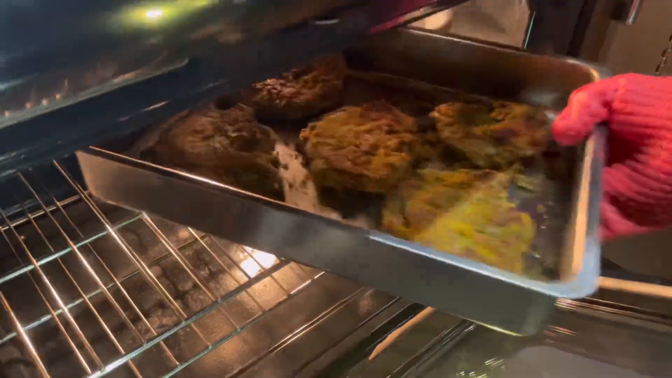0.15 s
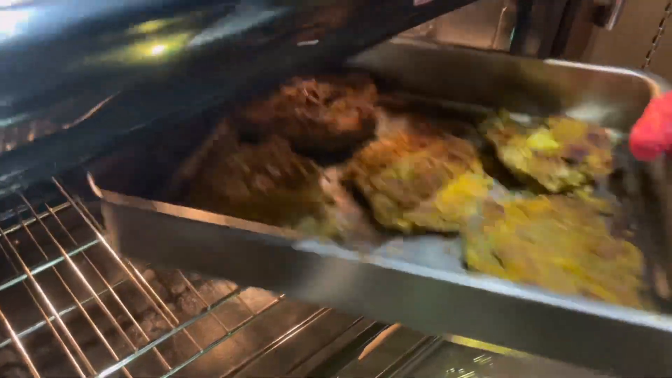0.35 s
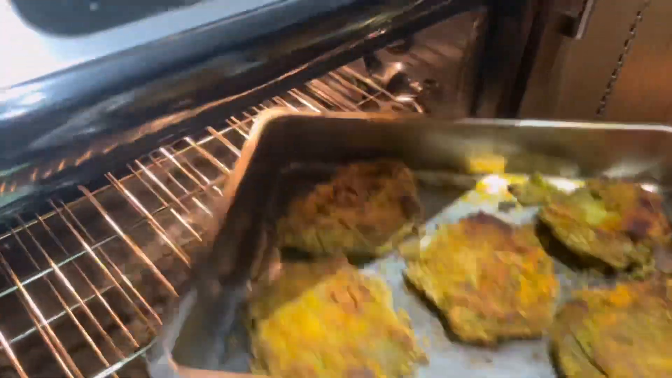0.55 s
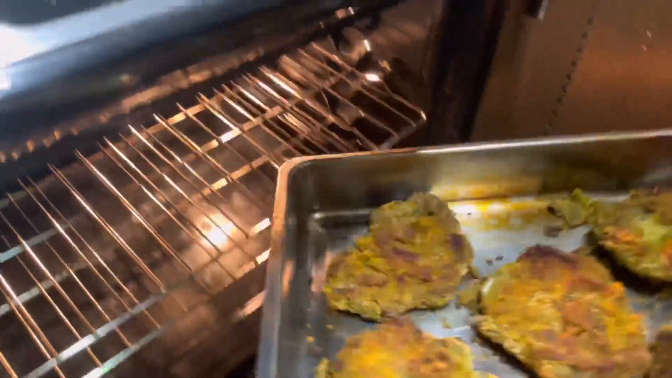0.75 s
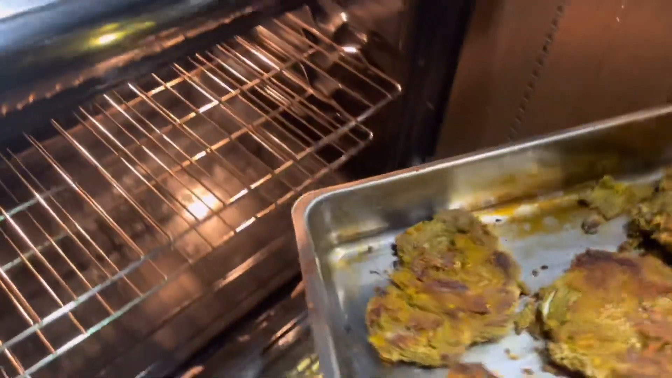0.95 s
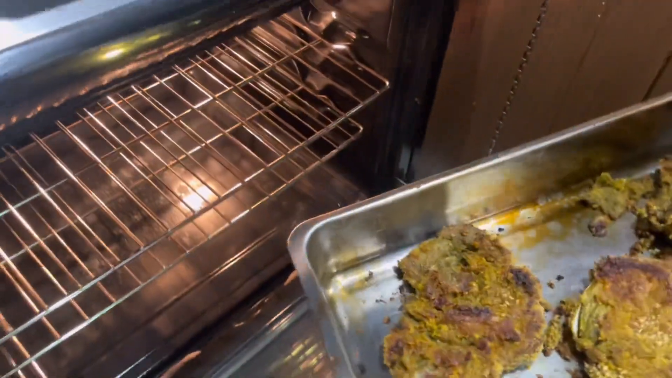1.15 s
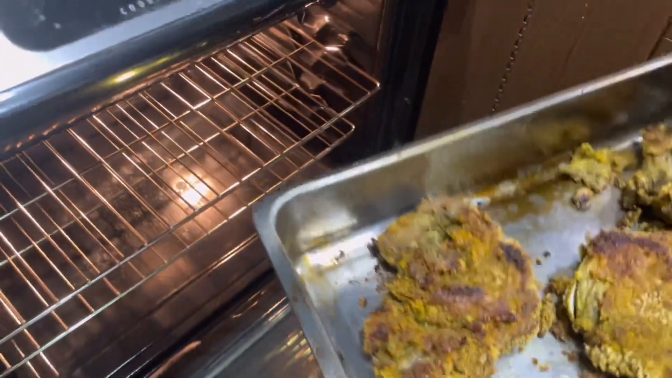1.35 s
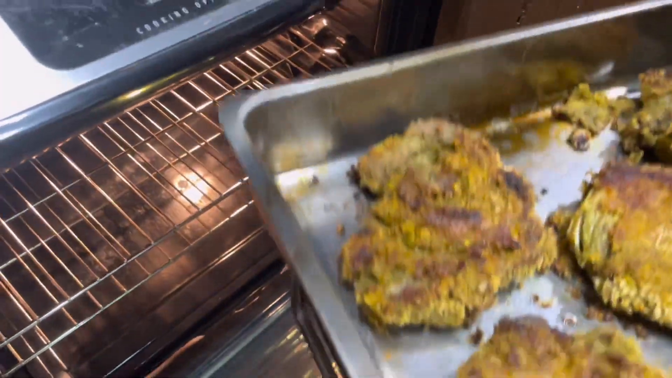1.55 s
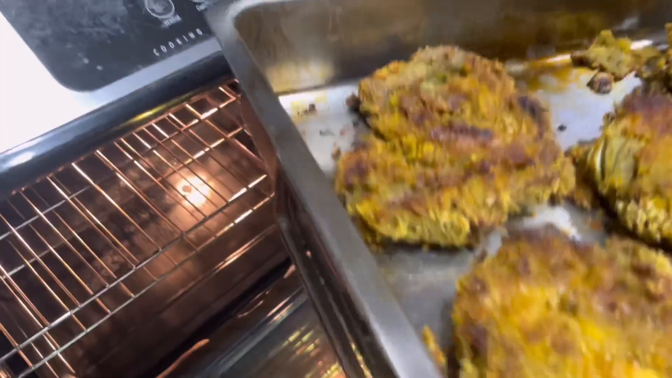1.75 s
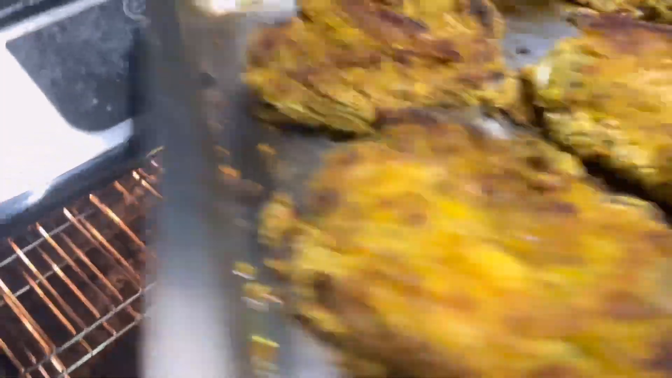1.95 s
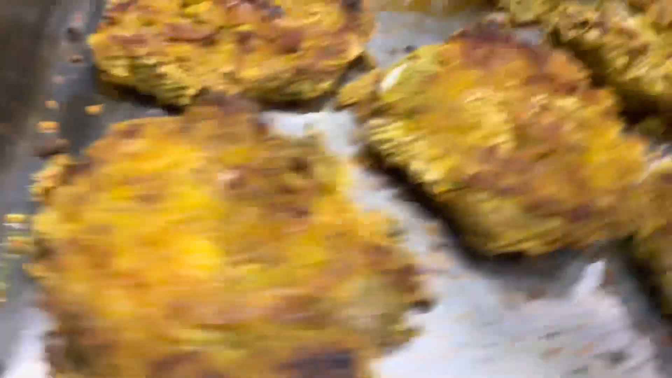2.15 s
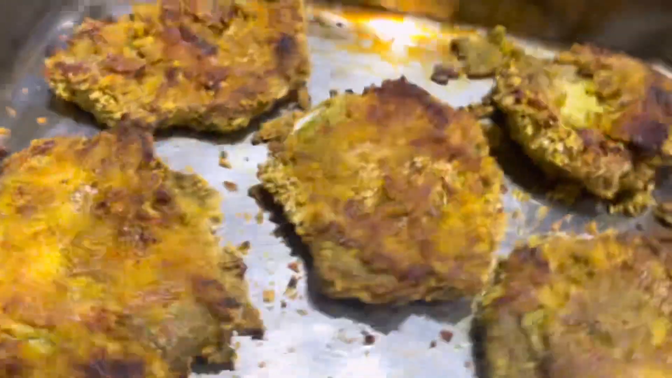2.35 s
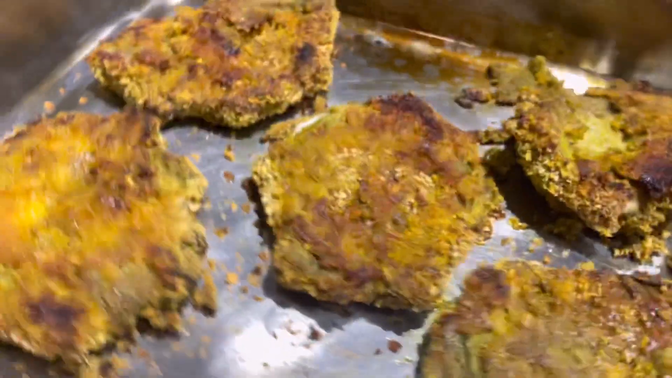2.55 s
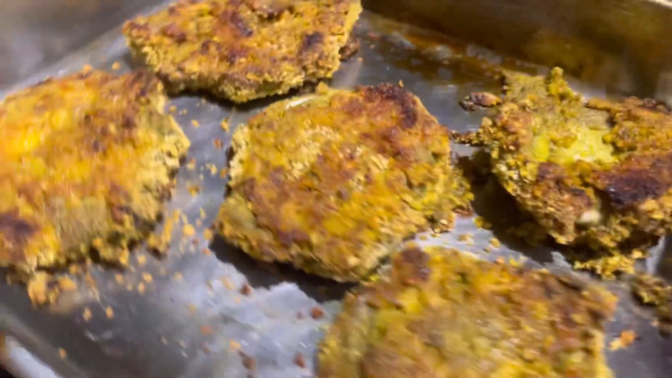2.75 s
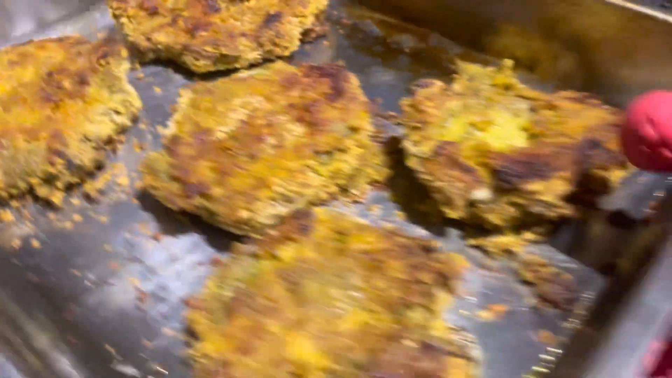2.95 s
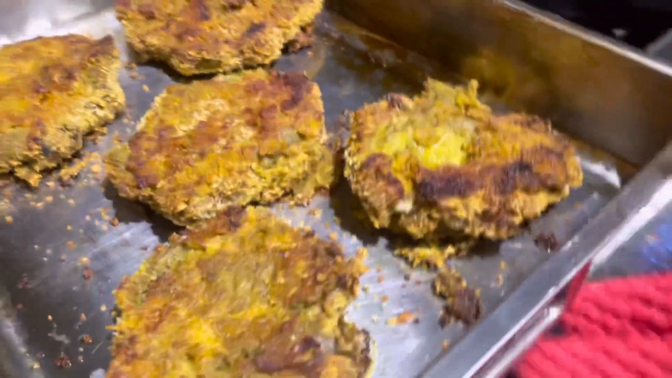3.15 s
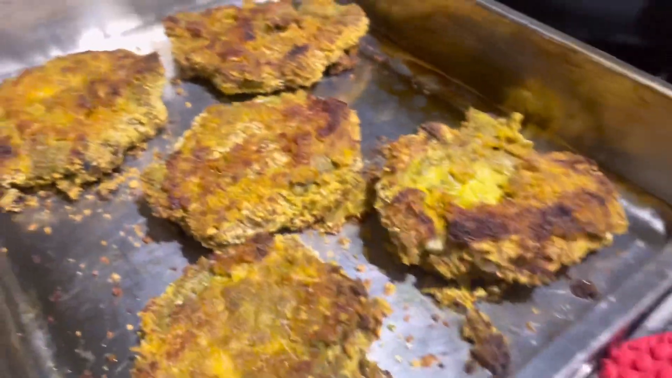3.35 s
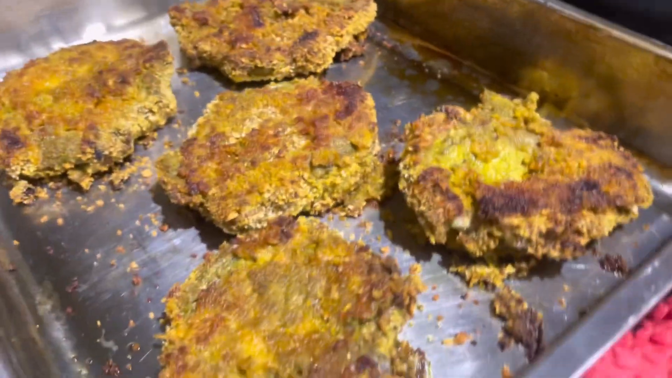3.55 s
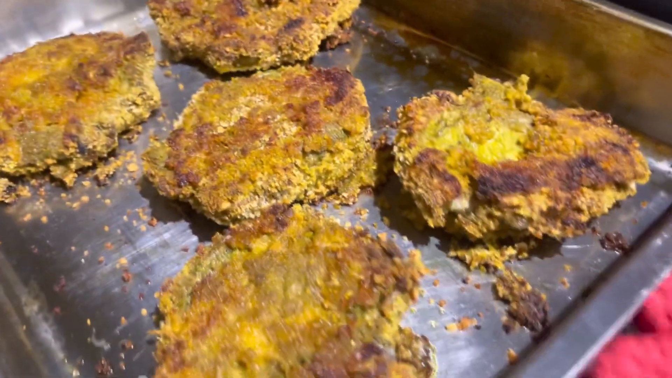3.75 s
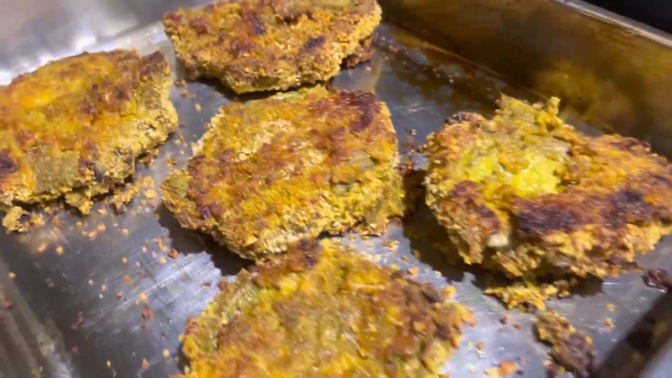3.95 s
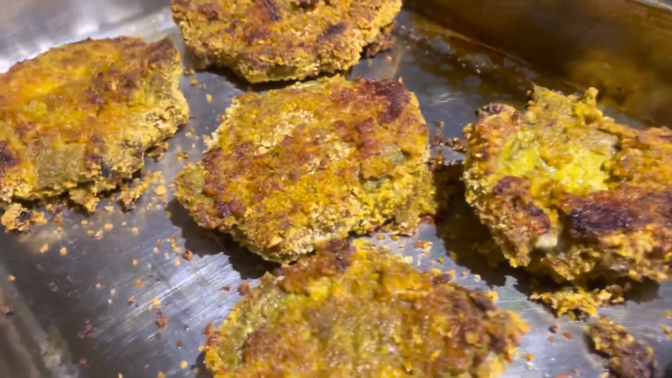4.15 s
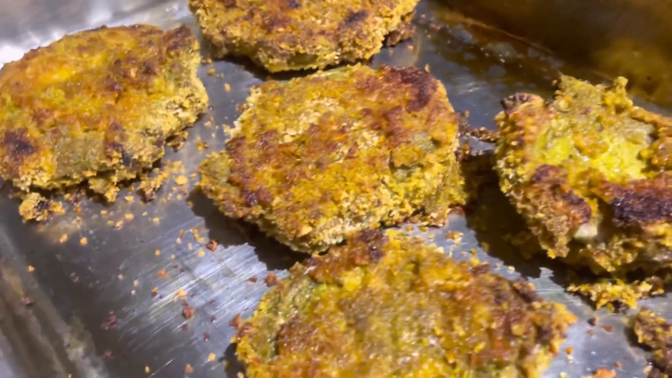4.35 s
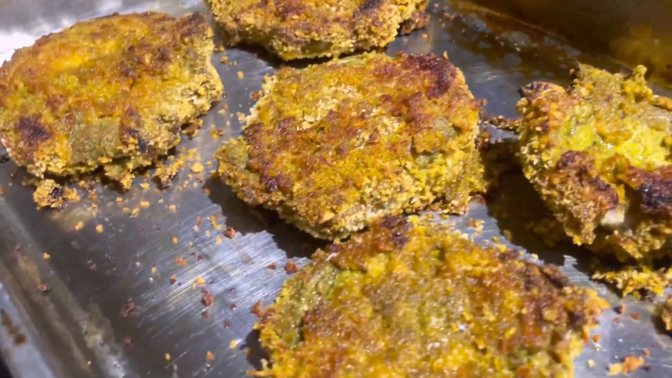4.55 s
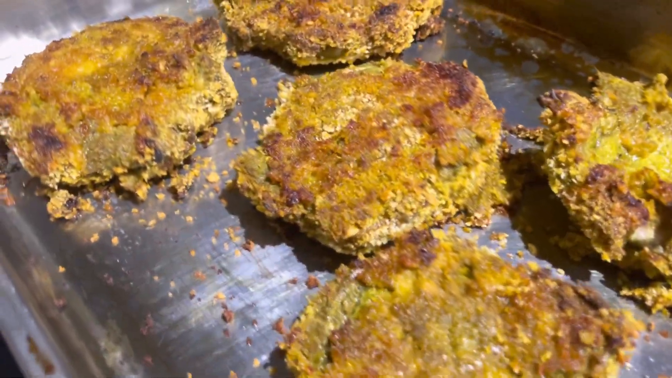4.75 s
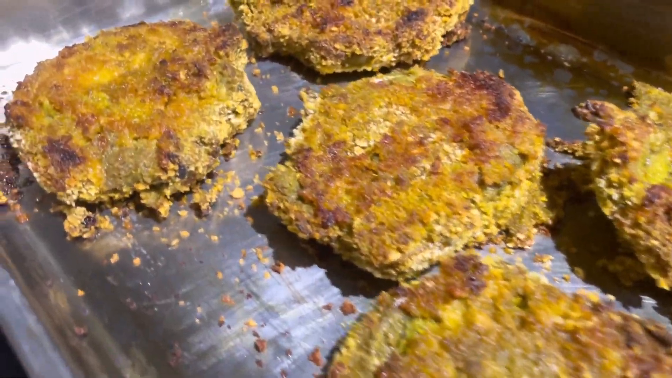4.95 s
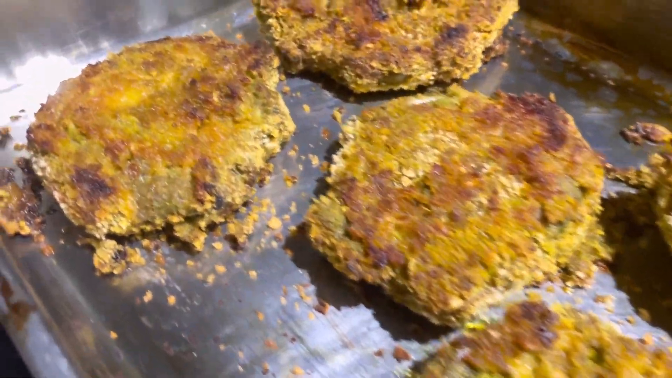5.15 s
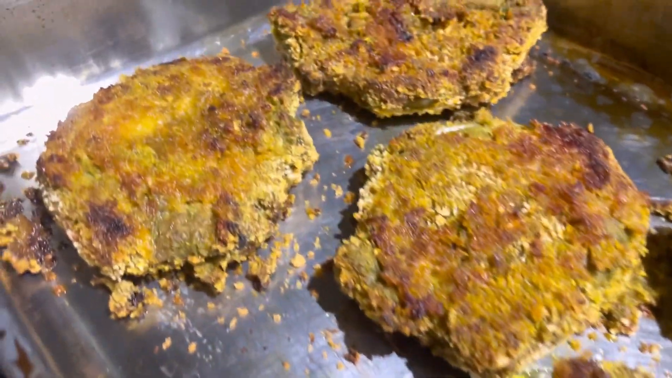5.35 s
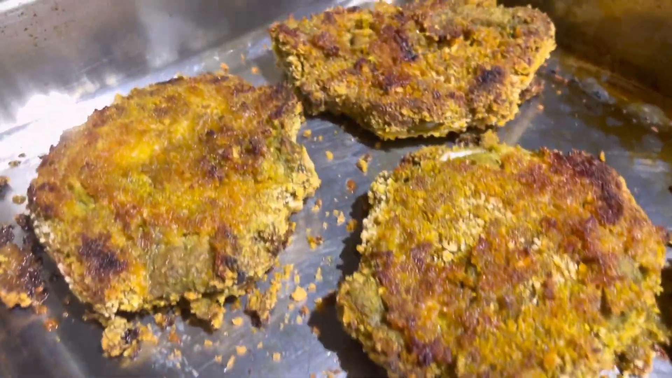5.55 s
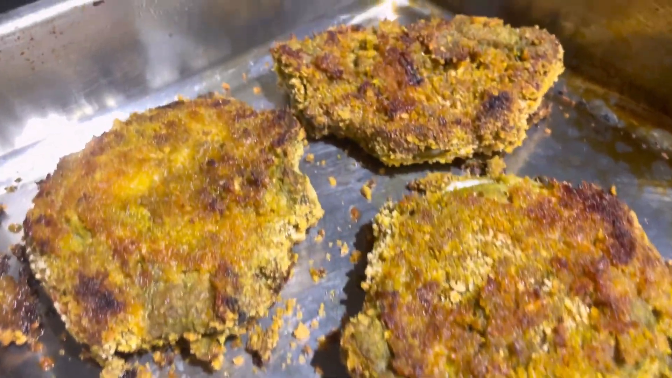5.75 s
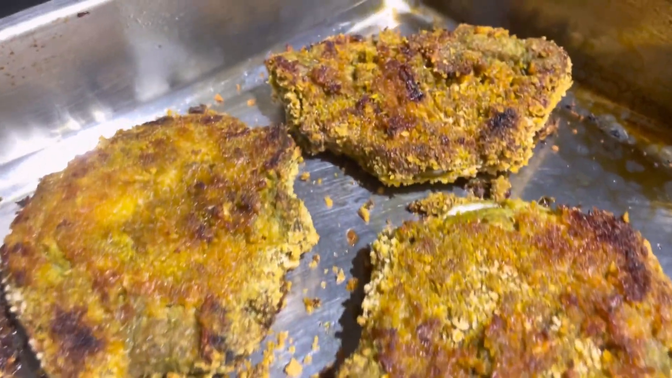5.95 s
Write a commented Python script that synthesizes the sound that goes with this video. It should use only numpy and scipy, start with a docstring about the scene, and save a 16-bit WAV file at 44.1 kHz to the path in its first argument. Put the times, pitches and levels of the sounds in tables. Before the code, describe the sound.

A low, breathy oven fan hums throughout a small hard-walled kitchen. At the start a metal baking tray ticks and clanks ringingly against the oven's steel. After a pause it is set down in three quick hollow clacks, then slides with a short rattling scrape. A faint rub follows. Near the end the tray is nudged with dull thuds, tinny knocks and tiny high squeaks. Close handheld stereo microphone, moving from oven to tray.

```python
"""Baking tray out of the oven

A metal tray is lifted off an oven rack, clanks on the oven, is set down in three clacks and slid a little;
later it is nudged and squeaks. Struck and rubbed metal is noise contacts exciting decaying modes.
A fan hums throughout as shaped noise, boomier as the listening point moves from oven to tray.
The small kitchen adds reverberation, and two closely spaced microphone ports hear it all."""
import sys
import numpy as np
from scipy import signal
from scipy.fft import rfft, irfft, next_fast_len
from scipy.io import wavfile
from scipy.ndimage import uniform_filter1d, map_coordinates

SR = 44100
rng = np.random.default_rng(int(sys.argv[2]) if len(sys.argv) > 2 else 0)


def pcm_store(signal):
    """Save signal as 16-bit PCM."""
    levels = np.round(np.clip(np.atleast_2d(signal), -1, 1) * 32767)
    wavfile.write(sys.argv[1], SR, levels.astype(np.int16).T)


N = 264644
TIME = np.arange(N) / SR
# padded transform length and its frequencies in Hz
SIZE = next_fast_len(N + SR, True) // 2 * 2
FREQS = np.arange(SIZE // 2 + 1) * SR / SIZE

# Fan noise in front of the oven. Each row: frequency in Hz, relative level in dB.
FAN_AT_OVEN = [(28, -94), (50, -11.5), (90, -23.5), (130, -8), (160, -17.5), (192, -6), (245, -25),
               (305, -13.5), (400, -26.5), (480, -23), (700, -28.5), (1000, -28), (1400, -30), (3000, -37),
               (3700, -37.5), (4900, -37), (5700, -47.5), (6800, -44.5), (8000, -50.5), (15000, -59.5)]
# Fan noise by the tray. Each row: frequency in Hz, relative level in dB.
FAN_BY_TRAY = [(28, -31), (50, -11.5), (130, -5), (240, -10.5), (310, -6), (400, -22), (520, -16.5),
               (650, -32), (880, -28.5), (1100, -24), (1400, -25.5), (2700, -36.5), (4900, -40.5),
               (5700, -47.5), (6700, -42.5), (8000, -45), (15000, -57)]
# Fan along the way. Each row: time in seconds, gain of the oven noise in dB, gain of the tray-side air in dB.
FAN_WAY = [(0, 2, -43), (.8, 0.3, -18), (1.5, -.5, -15), (2.3, -0.5, -7.5), (3.3, -2.5, -2.5),
           (4.2, -6.5, 0), (4.9, -2, 0.5), (5.4, -5.5, 0.5), (6, -0.5, 1.5)]
# Nearest reflection. Each row: time in seconds, delay in ms.
REFLECTION = [(0, 1.2), (.9, 1.19), (1.5, 2.15), (2.3, 2.3), (3.3, 1.3), (4.2, 2.4), (6, 2.1)]
# Drifting hollow band in the air noise. Each row: time in seconds, centre in Hz, level in dB.
HOLLOW = [(.5, 1393, -48.5), (.9, 1384, -48), (1.25, 1304, -45), (1.5, 1276, -53), (1.72, 1200, -42.5),
          (2.05, 1356, -55), (2.3, 1349, -41), (3.2, 1330, -53), (3.65, 1402, -51), (4.1, 1387, -45),
          (4.8, 1373, -48.5), (5.35, 1365, -40), (6, 1377, -38)]
# Second hollow band, mostly above it. Each row: time in seconds, centre in Hz, level in dB.
UPPER_HOLLOW = [(.6, 1800, -56), (1.15, 1884, -46.5), (1.35, 1650, -56), (1.5, 1644, -43),
                (1.72, 1748, -49), (1.95, 1583, -43), (2.3, 1700, -51), (3.25, 1620, -45),
                (3.65, 2100, -47), (3.95, 1750, -55), (4.95, 1691, -48), (5.4, 2098, -51), (6, 2150, -44)]
# Share of the sound that differs between the ports. Each row: frequency in Hz, relative level in dB.
DIFFUSE = [(50, -18), (130, -15.5), (250, -14), (500, -10), (1000, -8), (2500, -7), (5000, -7.5),
           (8000, -14), (12000, -17)]
# Lead of the left port. Each row: frequency in Hz, phase in radians.
PORT_PHASE = [(100, 0), (430, .1), (750, .8), (1300, .25), (2500, 1.3), (3600, .35), (4500, 1),
              (5900, -1.1), (6700, -.6), (7700, -2.7), (9500, -3.5), (10600, -4.5), (12500, -6.2)]
# Balance before each source's shadow strength. Each row: frequency in Hz, left minus right in dB.
PORT_BALANCE = [(60, 1.5), (450, 1), (900, 5.5), (1700, 1), (3800, 3), (6500, 2.5), (10000, -1.5)]
# Dull thuds on the counter. Each row: start in seconds, length in seconds, centre in Hz, level in dB.
THUMPS = [(5.531, 0.024, 111.3, -20), (5.584, 0.058, 67.7, -21.5), (5.741, 0.021, 82, -32),
          (5.959, 0.011, 108.8, -29)]
# Mitt on the rim. Each row: start in seconds, length in seconds, relative level in dB.
BRUSHES = [(3.505, 0.018, -43), (3.619, 0.051, -42.5)]
# Stick-slip squeaks. Each row: start in seconds, length in seconds, starting pitch in Hz, level in dB,
# waver as a share of the pitch.
SQUEAKS = [(5.577, 0.015, 5780, -32.5, 0.0015), (5.642, 0.049, 5715, -56, 0.0017),
           (5.714, .018, 5880, -46, 0.0042), (5.742, 0.016, 6060, -37, 0.0089),
           (5.76, 0.033, 5920, -45, 0.00405), (5.873, 0.02, 6020, -47, 0.0058)]
# Modes of the oven's steel. Each row: frequency in Hz, relative level in dB, t60 in seconds.
OVEN_STEEL = [(451, -8, .28), (714.4, 1.5, 0.14), (829, -11, 0.6), (1045, -19, 0.44), (1653, -18.5, .3),
              (1800, -12, .09), (2285, -7, .08), (2570, -17, .09), (2870, -20, 0.096), (3620, -10, 0.046),
              (4800, -12, .05), (4900, -26, 0.43), (5460, -20, 0.064)]
# Nominal modes of the tray. Each row: frequency in Hz, relative level in dB, t60 in seconds.
TRAY = [(174, -6, 0.061), (197.5, 5, 0.081), (239.5, -1, 0.14), (278, -15, 0.091), (377.4, -2, 0.16),
        (452.5, -4.5, 0.33), (548, 0.5, 0.092), (699, -9.5, 0.25), (718, -4, 0.15), (780, 2.5, 0.13),
        (835, -14, 0.079), (969, -5, 0.2), (1036, -9, .25), (1170, -5, 0.059), (1280, -4.5, 0.16),
        (1645, -17, 0.062), (1920, -2, 0.079), (2084, 6, 0.068), (2660, 3.5, 0.091), (2864, -6, 0.14),
        (3340, -10, 0.1), (3500, -16, 0.15), (4020, -6, 0.14), (4790, -15, 0.3)]
# Pushes on the tray. Each row: start in seconds, length in seconds, friction in dB, release in dB per second.
PUSHES = [(0.004, 0.016, -5.5, 142), (2.759, 0.16, 5, 110), (2.975, 0.044, 0.5, 92),
          (3.058, .015, -16, 124), (3.604, 0.15, -5.5, 120), (5.524, 0.051, 0.5, 120)]
# Colour of the scrape. Each row: frequency in Hz, relative level in dB.
SCRAPE = [(100, -16), (300, -27.5), (450, -11), (560, -12.5), (720, -22), (1050, -21), (1500, -26),
          (2500, -30.5), (4500, -35.5), (6000, -40.5), (9000, -38), (15000, -43.5)]
# Blows on the tray; how it is held and supported shifts and damps its modes. Each row: start in seconds,
# thud in dB, clack in dB, crack in dB, decay in ms, ring in dB, frequency the contact point favours in Hz,
# its reach in octaves, pitch factor, ring length factor.
BLOWS = [(0.095, -26, -25.5, -27.5, 17, -37, 2900, .6, 1.2, 0.66),
         (0.2089, -38, -19.5, -22, 47, -42, 2900, .6, 1.3, 0.55),
         (0.317, -9, -20, -10.5, 18.5, -16, 1150, 0.24, 0.95, 1),
         (0.3273, -5, -11, -35, 8.3, -8.5, 206, 0.16, 1.1, 0.64),
         (.345, -26, -14, -25, 82, -30, 830, 0.13, 1.13, 1.5),
         (2.523, -4, -6.5, -15.5, 3.1, -12.5, 857, 0.42, 1, 0.5),
         (2.5271, -2, -11, -28, 4.3, -14.5, 338, 0.4, 0.88, .8),
         (2.5399, -5, -22, -31, 8, -18, 850, 0.24, 1.03, 0.37),
         (2.6177, -2.5, -6, -22, 4.2, -7, 692, 0.11, 1.01, 1.13),
         (2.633, -8, -16, -36, 14, -23, 2100, 0.22, 1, 0.56),
         (2.664, -8.5, -18, -31, 27, -37, 1100, 0.55, .99, 0.82),
         (2.7186, -15, -3.5, -22.5, 2.2, -15.5, 420, 0.26, 1.1, 0.79),
         (2.7221, -4.5, -1, -19.5, 1.6, -13, 1000, 0.41, 1, 0.79),
         (2.769, -17, -18, -31, 3.1, -33, 1000, 0.52, 1.15, .8),
         (2.799, -11, -42, -23, 3.6, -39, 4000, .4, 0.91, 0.54),
         (2.881, -20, -21, -44, 12, -20, 650, 0.2, 1.04, .7),
         (2.974, -27, -25, -36, 7.3, -22, 1200, 0.25, 1.43, 0.71),
         (3.058, -16, -47, -25.5, 17, -45, 4200, 0.54, 1.05, 0.88),
         (5.5169, -18, -13.5, -25.5, 11, -13.5, 250, 0.16, 1.04, 0.88),
         (5.522, -5, -16.5, -27, 19, -13.5, 371, 0.17, 1, 1.2),
         (5.539, -4, -18, -26, 14, -18, 1410, 0.27, 1.02, 0.62),
         (5.565, -4, -20.5, -22.5, 35, -22, 2900, 0.09, .98, 0.8),
         (5.577, -9, -20, -29, 12, -24, 470, .2, 1.08, 0.61),
         (5.615, -6, -24, -40, 11, -22, 300, 0.44, 1, 0.64),
         (5.631, -12, -25, -35, 12, -23.5, 328, 0.67, 1, 1.6),
         (5.694, -15, -28, -37, 8.8, -21, 259.6, 0.52, 0.98, 0.38),
         (5.953, 1, -23, -39, 9.3, -32, 200, 0.35, 1.05, 0.57)]

# how the ports hear each source: (strength of the shadow, extra dB of what differs between them)
HEARD_OVEN, HEARD_BY_TRAY, HEARD_TRAY = (0.52, 4.3), (1.77, 0.13), (0.6, 2.7)


def undb(db):
    """Logarithmic levels: decibels to amplitude gain."""
    return 10 ** (np.asarray(db) / 20)


def curves(table):
    """Linear interpolation: each column of (s, ..) rows at every sample."""
    s, *columns = np.transpose(table)
    return [np.interp(TIME, s, column) for column in columns]


def across(points, freqs):
    """Interpolation of (Hz, value) points on a logarithmic frequency axis."""
    hz, value = np.transpose(points)
    return np.interp(np.log(freqs + 1), np.log(hz), value)


def filtered(x, response):
    """Linear filtering by a frequency response given at FREQS."""
    return irfft(rfft(x, SIZE) * response, SIZE)[..., :N]


def colour(x, points, size=4096):
    """Minimum phase: a causal filter with the gains of (Hz, dB) points, from the folded cepstrum."""
    freqs = np.arange(size // 2 + 1) * SR / size
    cepstrum = irfft(np.log(undb(across(points, freqs))))
    cepstrum[1:size // 2] *= 2
    cepstrum[size // 2 + 1:] = 0
    impulse = irfft(np.exp(rfft(cepstrum)))
    return signal.fftconvolve(x, impulse[None], axes=1)[:, :x.shape[1]]


def walk(rate):
    """Slow random variation: levels held 1 / rate s and smoothed twice, standard deviation 1."""
    hold = int(SR / rate)
    y = np.repeat(rng.standard_normal(N // hold + 1), hold)
    y = uniform_filter1d(uniform_filter1d(y, hold), hold)[:N]
    return y / y.std()


def grit(size, spread_db):
    """Dense micro-impacts: two rows of noise of uneven strength, rms 1."""
    # the strength changes every 32 samples, alike in both rows
    strength_db = spread_db * np.repeat(rng.standard_normal(size // 32 + 1), 32)[:size]
    x = rng.standard_normal((2, size)) * undb(strength_db)
    return x / np.sqrt(np.mean(x ** 2))


def band(hz, width_hz):
    """Modulated noise: two rows in a narrow resonance whose centre may move, joint deviation 1."""
    slow = filtered(rng.standard_normal((2, 2, N)), 1 / (1 + (2 * FREQS / width_hz) ** 2))
    phase = 2 * np.pi * np.cumsum(hz * np.ones(N)) / SR
    x = slow[0] * np.cos(phase) + slow[1] * np.sin(phase)
    return x / x.std()


def swell(start_s, length_s, attack_s, release_db_per_s, sag_db_per_s=0):
    """Envelope: rises to full at start_s, sags while held, then decays exponentially."""
    t = TIME - start_s
    attack = np.clip(1 + t / attack_s, 0, 1) ** 2
    sag_db = sag_db_per_s * np.clip(t, 0, length_s)
    release_db = release_db_per_s * np.maximum(t - length_s, 0)
    return attack * undb(-sag_db - release_db)


def add(out, s, x):
    """Superposition: mix x into out from time s."""
    i = int(s * SR)
    out[:, i:i + x.shape[1]] += x[:, :N - i]


def kitchen(x, wet_db=-5.5):
    """Reverberation: hard cupboards and walls return a short, slightly dull exponential tail."""
    t = np.arange(SR // 2) / SR
    t60_s, gap_s = .52, .006
    tail = rng.standard_normal((2, len(t))) * np.exp(-np.log(1000) * t / t60_s) * (t > gap_s)
    tail /= np.sqrt(np.sum(tail[0] ** 2))
    tail = colour(tail, [(200, -4.5), (700, -6.5), (1300, -4.0), (4000, -6.5), (14000, -12)])
    return x + undb(wet_db) * signal.fftconvolve(x[:1], tail, axes=1)[:, :N]


def ports(x, shade, apart_db):
    """Coherence: row 0 reaches both ports alike, row 1 differs; the body between adds lag and shadow."""
    diffuse = undb(across(DIFFUSE, FREQS) + apart_db)
    shares = np.array([np.ones_like(diffuse), diffuse]) / np.sqrt(1 + diffuse ** 2)
    common, apart = filtered(x, shares)
    side = np.array([[1], [-1]])
    shadow = undb(side * shade * across(PORT_BALANCE, FREQS) / 2)
    lag = np.exp(1j * side * across(PORT_PHASE, FREQS) / 2)
    return filtered(common + side * apart, shadow * lag)


def standing_waves(depth_db, spacing_hz=22):
    """Room modes: the fine, uneven response of an enclosure, shallower in the bass."""
    nodes = np.arange(0, SR / 2, spacing_hz)
    ripple = np.interp(FREQS, nodes, rng.standard_normal(len(nodes)))
    gain = undb(depth_db * ripple * FREQS / (FREQS + 500))
    return gain / np.sqrt(np.mean(gain ** 2))


def fan(spectrum, gain, reflection=0.16, flutter_db=1.27, ripple_db=3, count=7):
    """Interference: shaped air noise through changing standing waves, plus a near reflection."""
    noise = rng.standard_normal((2, N))
    shape = undb(across([(12, -60)] + list(spectrum), FREQS))
    # fade through a row of listening places, each with its own standing waves
    place = np.linspace(0, count - 1, N)
    air = np.zeros((2, N))
    for k in range(count):
        nearness = np.maximum(1 - abs(place - k), 0)
        air += filtered(noise, shape * standing_waves(ripple_db)) * nearness
    air *= gain
    # only wavelengths shorter than the surface come back from it
    treble = filtered(air, FREQS ** 2 / (FREQS ** 2 + 700 ** 2))
    delay_ms, = curves(REFLECTION)
    echo = np.array([np.interp(TIME - delay_ms / 1000, TIME, row) for row in treble])
    return (air + reflection * echo) * undb(flutter_db * walk(4.776))


def oven_hum(oven_db, hz=194, width_hz=30, hum_db=-40):
    """Cavity resonance: the oven hums in a narrow band that follows the level of its fan noise."""
    return band(hz, width_hz) * undb(hum_db + oven_db)


def hollow_bands(width_hz=150, upper_width_hz=170):
    """Moving resonances: two hollow bands of noise drift and swell."""
    hz, db = curves(HOLLOW)
    upper_hz, upper_db = curves(UPPER_HOLLOW)
    return band(hz, width_hz) * undb(db) + band(upper_hz, upper_width_hz) * undb(upper_db)


def thump(width_hz=50, lowest_hz=48):
    """Low resonance: the counter takes the nudged tray's weight and rumbles."""
    attack_s, release_db_per_s = 0.031, 170
    rumble = np.zeros((2, N))
    for s, length, hz, db in THUMPS:
        rumble += band(hz, width_hz) * undb(db) * swell(s, length, attack_s, release_db_per_s)
    return signal.sosfilt(signal.butter(4, lowest_hz, "high", fs=SR, output="sos"), rumble)


def mitt(grain_db=3):
    """Soft friction: the oven mitt's rubber brushes the rim with a fine bright hiss."""
    attack_s, sag_db_per_s, release_db_per_s = 0.023, 62, 140
    rub = sum(undb(db) * swell(s, length, attack_s, release_db_per_s, sag_db_per_s)
              for s, length, db in BRUSHES)
    return colour(grit(N, grain_db) * rub,
                  [(500, -8), (3000, 8.5), (6000, -0.5), (11000, -4), (16000, -11)])


def squeaks(octave_db=-7):
    """Stick-slip: thin tones with their octave creep upward and waver as the grip is unsteady."""
    attack_s, release_db_per_s, rise_hz_per_s = 0.019, 600, 630
    tone, unsteady = np.zeros(N), walk(510)
    for s, length, hz, db, waver in SQUEAKS:
        rising = hz + rise_hz_per_s * np.clip(TIME - s, 0, length)
        phase = 2 * np.pi * np.cumsum(rising * (1 + waver * unsteady)) / SR
        envelope = undb(db) * swell(s, length, attack_s, release_db_per_s)
        tone += envelope * (np.sin(phase) + undb(octave_db) * np.sin(2 * phase))
    return np.array([tone, np.zeros(N)])


def clank(start_s=.3178, level_db=-14, attack_s=0.00082, apart_db=-3):
    """Modal ringing: the tray's rim catches the oven's steel on the way out and excites its modes."""
    t = np.maximum(TIME[:SR] - start_s, 0)
    hz, db, t60 = np.transpose(OVEN_STEEL)
    modes = np.exp((2j * np.pi * hz[:, None] - np.log(1000) / t60[:, None]) * t)
    phases = np.exp(2j * np.pi * rng.random((2, len(hz))))
    gains = undb(db + level_db) * phases * undb([[0], [apart_db]])
    out = np.zeros((2, N))
    add(out, 0, (gains @ modes).imag * (1 - np.exp(-t / attack_s)))
    return out


def rack(t60_s=0.11, count=420):
    """Modal density: unit-energy impulse response of the many small modes of rim and rack wires."""
    t = np.arange(SR // 3) / SR
    place, turn = rng.random((2, count))
    hz = 600 + 15000 * ((np.arange(count) + place) / count) ** 1.5
    # t60_s holds at 2 kHz; higher modes die sooner
    t60 = t60_s * (hz / 2000) ** -.25
    # sparser high modes are stronger, so that the whole stays even in colour
    gains = np.sqrt(np.cbrt(hz) / t60)
    tones = np.sin(2 * np.pi * (hz[:, None] * t + turn[:, None]))
    ring = gains @ (tones * np.exp(-np.log(1000) * t / t60[:, None]))
    return ring / np.sqrt(np.sum(ring ** 2))


def jangle(force, wires, share_db):
    """Forced response: a contact force plus the small modes it excites, weighted to hold the power."""
    ring = signal.fftconvolve(force, wires[None], axes=1)[:, :force.shape[1]]
    return (force + undb(share_db) * ring) / np.sqrt(1 + undb(2 * share_db))


def sheet_ring(ring_hz, pitch, length, reach, bright=0, size=SR // 3):
    """Modal excitation: a tap favours modes near ring_hz; their pitch bends as the sheet settles."""
    # detune and bend are shares of the pitch
    detune, bend, settle_s, bright_hz, attack_s = 0.0047, 0.013, 0.021, 2500, 0.0016
    t = np.arange(size) / SR
    hz, db, t60 = np.transpose(TRAY)
    hz = hz * pitch * (1 + detune * rng.uniform(-0.91, 1, len(hz)))
    favoured = 1 / (1 + (np.log2(hz / ring_hz) / reach) ** 2)
    gains = undb(db) * (favoured + bright / (1 + (bright_hz / hz) ** 4))
    settling = settle_s * (1 - np.exp(-t / settle_s))
    bent = t + bend * rng.standard_normal((len(hz), 1)) * settling
    modes = np.exp(2j * np.pi * hz[:, None] * bent - np.log(1000) * t / (length * t60[:, None]))
    phases = np.exp(2j * np.pi * rng.random((2, len(hz))))
    return ((gains * phases) @ modes).imag * (1 - np.exp(-t / attack_s))


def friction():
    """Sliding friction: each push builds up quickly, then sags as the tray slows."""
    attack_s, sag_db_per_s = 0.023, 16
    return sum(undb(db) * swell(s, length, attack_s, release, sag_db_per_s)
               for s, length, db, release in PUSHES)


def rattle(rattle_db=-25, spread_db=2.0, ring_hz=650, length=0.32, bright=0.2, count=16):
    """Repeated impact: the sliding tray hops; each landing spot briefly rings its own mix of modes."""
    from_s, to_s = 2.77, 3.08
    out, force = np.zeros((2, N)), friction()
    for k, (late, size, spot, support) in enumerate(rng.uniform(-1, 1, (count, 4))):
        s = from_s + (k + late / 2) / count * (to_s - from_s)
        ring = sheet_ring(ring_hz * 2 ** (0.89 * spot), 1 + .09 * support, length, .4, bright, SR // 10)
        add(out, s, ring * force[int(s * SR)] * undb(rattle_db + 2 * spread_db * size))
    return out


def scrape(wires, grain_db=2.0, resonance_db=-2, width_hz=45, jangle_db=-7):
    """Surface roughness: the base rubs over tiny bumps, coloured by the damped sheet's resonances."""
    judder_db, wander_s, wander_per_s = .7, .0012, 14
    force = grit(N, grain_db) * friction() * undb(judder_db * walk(70))
    bumps = jangle(force, wires, jangle_db)
    # the modes add in power, so close neighbours do not pile up into one ring
    peaks = sum(1 / (1 + (2 * (FREQS - hz) / width_hz) ** 2) for hz, _, _ in TRAY)
    sheet = np.sqrt(1 + undb(2 * resonance_db) * peaks)
    rub = filtered(bumps, sheet * undb(across([(22, -62)] + SCRAPE, FREQS)))
    # a wandering delay shifts the resonances as the contact moves
    place = (TIME + wander_s * walk(wander_per_s)) * SR
    return np.array([map_coordinates(row, [place], mode="mirror") for row in rub])


def blow(wires, thud_db, clack_db, crack_db, decay_ms, ring_db, ring_hz, reach, pitch, length):
    """Impact: the rim chatters in a short noise burst and the sheet rings in its modes."""
    chatter_db, jangle_db, rim_db = 2.5, -4, -2.0
    t = np.arange(SR // 3) / SR
    envelope = (1 - np.exp(-t / 0.00069)) * np.exp(-t * 1000 / decay_ms)
    # equal energy whatever the decay
    envelope /= np.sqrt(np.sum(envelope ** 2) / (0.034 * SR))
    # the fizz at the very top follows the crack
    fizz_db = crack_db - 13
    tone = [(25, thud_db - 57), (65, thud_db - 6), (220, thud_db),
            (850, clack_db), (1600, (clack_db + crack_db) / 2), (4000, crack_db - 4.5),
            (6500, (crack_db + fizz_db) / 2 - 5.0), (11000, fizz_db), (16000, fizz_db - 14.0)]
    chatter = grit(len(t), chatter_db) * envelope
    contact = colour(jangle(chatter, wires, jangle_db), tone)
    # a short, hard contact also rings the high modes of the rim
    bright = undb(crack_db + rim_db - ring_db) / np.sqrt(decay_ms)
    return contact + undb(ring_db) * sheet_ring(ring_hz, pitch, length, reach, bright)


def knocks(wires):
    """Superposition of every blow on the tray."""
    out = np.zeros((2, N))
    for s, *row in BLOWS:
        add(out, s, blow(wires, *row))
    return out


def scene():
    """Superposition: the tray in the kitchen over the fan, whose boomier tray-side air takes over."""
    wires = rack()
    oven_db, by_tray_db = curves(FAN_WAY)
    oven = fan(FAN_AT_OVEN, undb(oven_db)) + oven_hum(oven_db) + hollow_bands()
    by_tray = fan(FAN_BY_TRAY, undb(by_tray_db))
    metal = mitt() + squeaks() + clank() + rattle() + scrape(wires) + knocks(wires)
    # the thumps stay dry
    tray = kitchen(metal) + thump()
    return ports(oven, *HEARD_OVEN) + ports(by_tray, *HEARD_BY_TRAY) + ports(tray, *HEARD_TRAY)


def record(dry):
    """Saturation and band limit: the loudest peaks are rounded and the top above 15.9 kHz is cut."""
    low_pass = signal.ellip(10, .2, 80, 15900, fs=SR, output="sos")
    return signal.sosfilt(low_pass, np.tanh(dry))


dry = scene()
out = record(dry)
pcm_store(out)
```